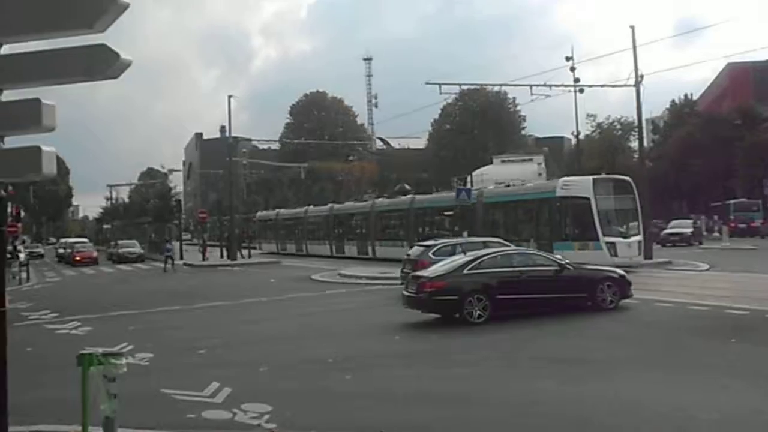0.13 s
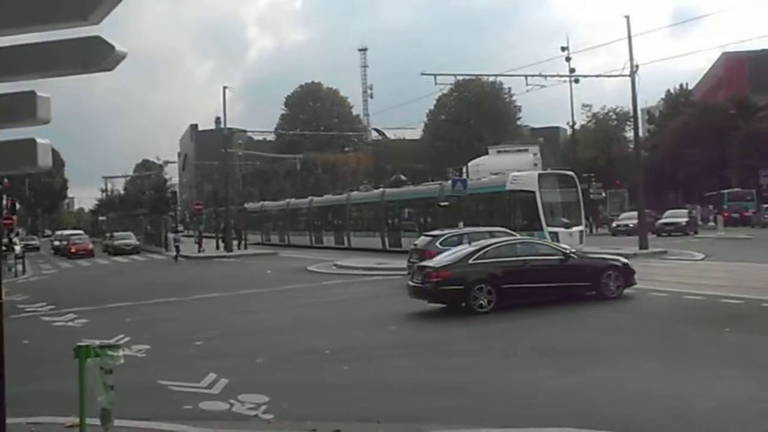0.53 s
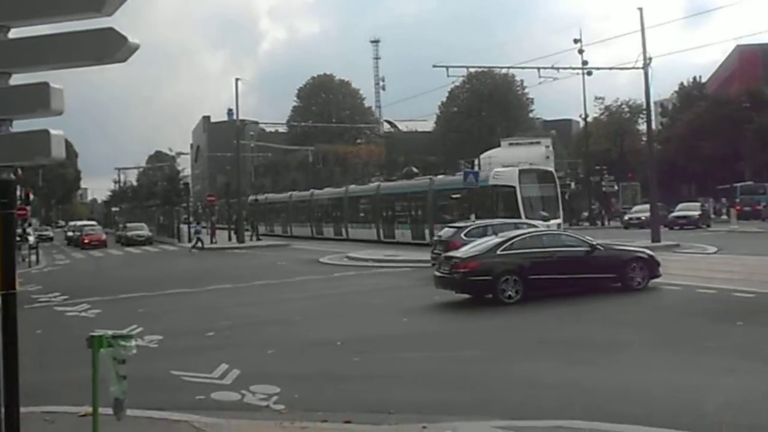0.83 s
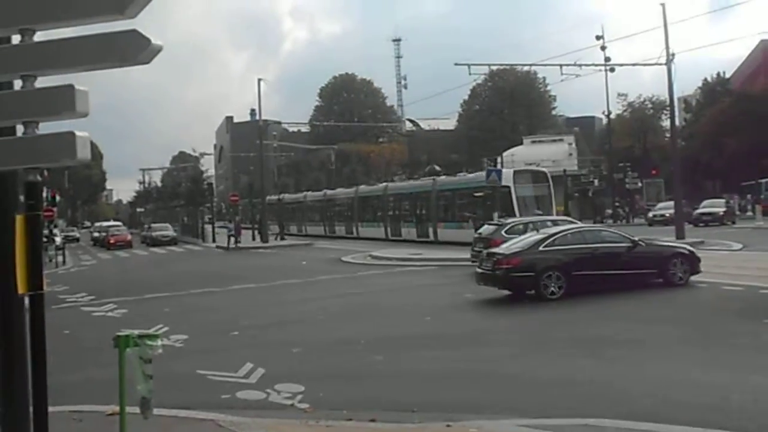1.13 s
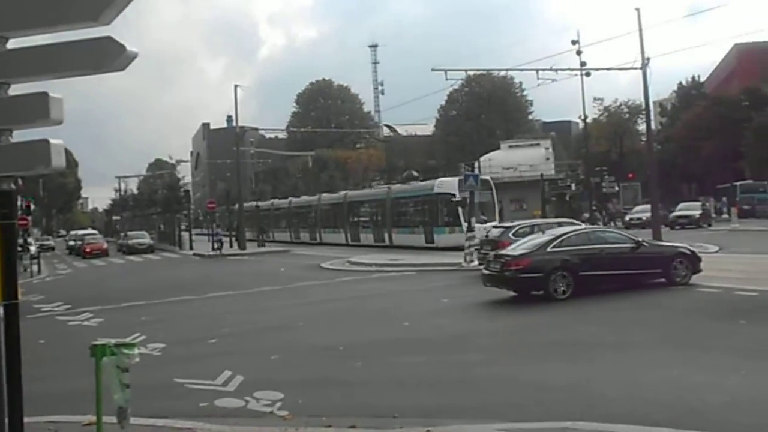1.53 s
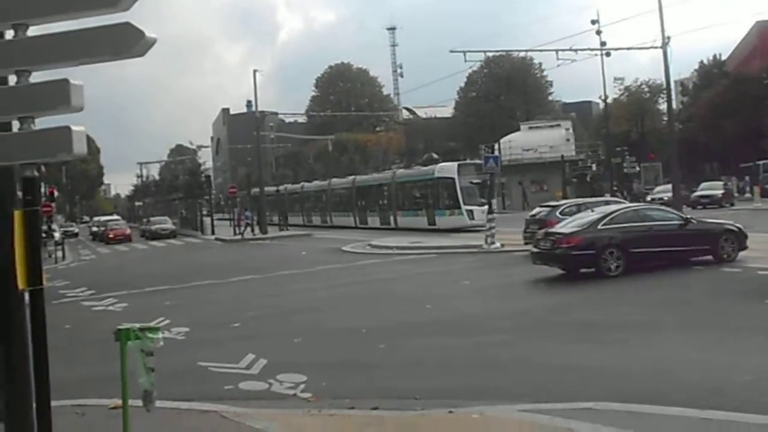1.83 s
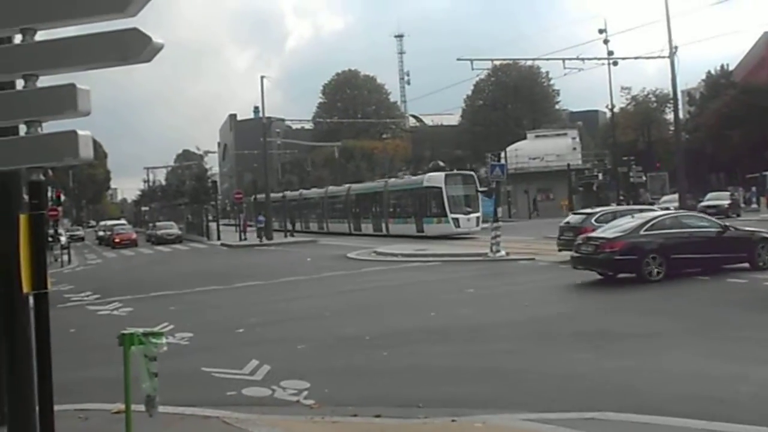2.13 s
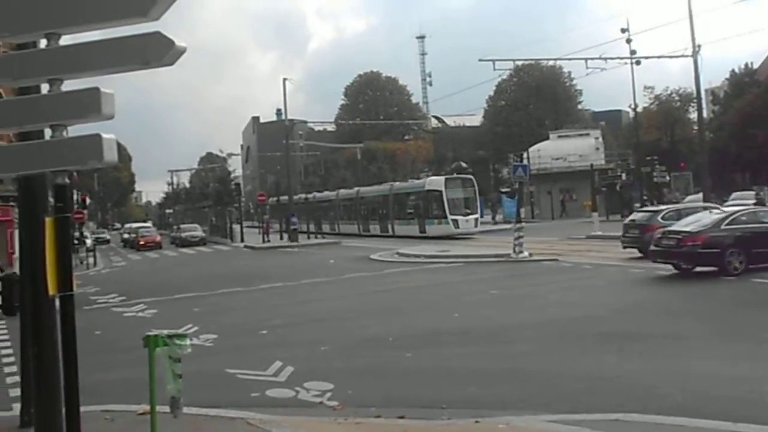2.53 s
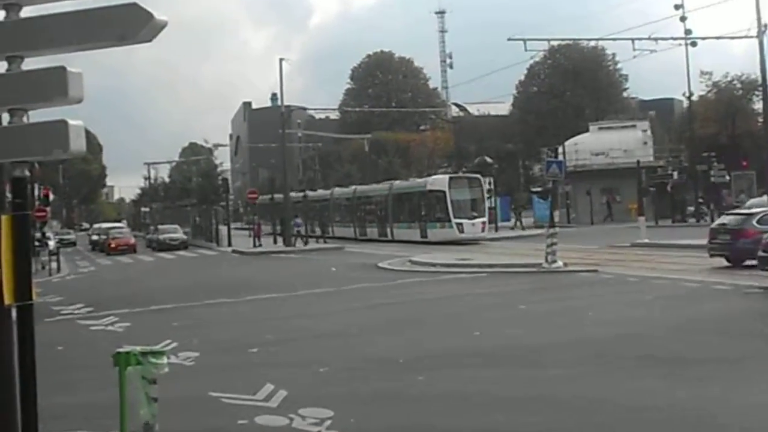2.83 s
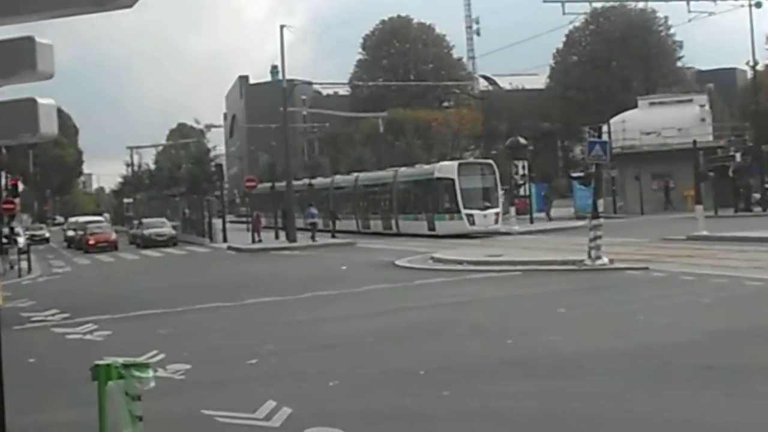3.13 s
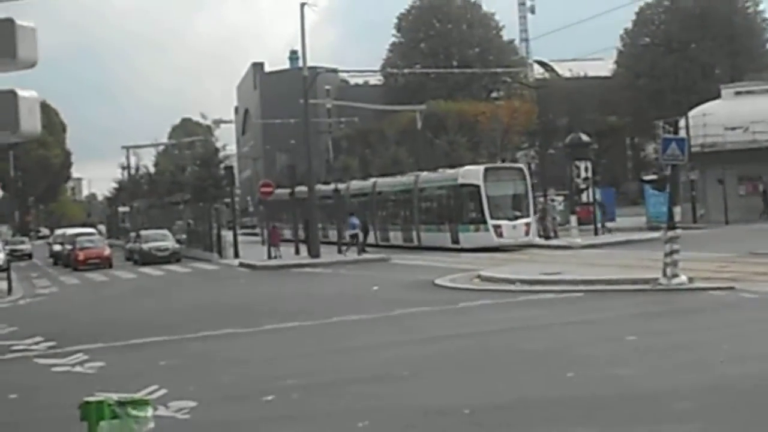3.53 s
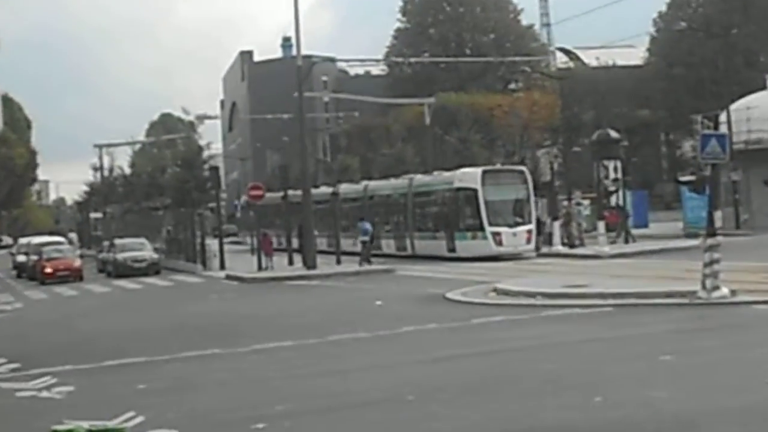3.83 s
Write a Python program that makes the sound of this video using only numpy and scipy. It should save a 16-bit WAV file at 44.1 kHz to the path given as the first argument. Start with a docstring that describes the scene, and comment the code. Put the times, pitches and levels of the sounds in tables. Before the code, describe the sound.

High, trembling metallic tram squeal rises out of fading-in road traffic noise at a junction

```python
"""Out of a moment's silence a broad city rumble fades up, with a tiny tick of hiss almost at once.
Traffic is shaped noise whose bands waver; engines and tram whines are unsteady tones mixed with narrow noise.
Two tram wheels then squeal on a curved rail: trembling tones with rough overtones, smeared by house echoes.
Puffs of filtered hiss, thin sagging squeaks and a sizzle of grinding flanges sit on top."""
import sys
import numpy as np
from scipy import signal
from scipy.fft import rfft, irfft
from scipy.io import wavfile

SR = 44100
rng = np.random.default_rng(int(sys.argv[2]) if len(sys.argv) > 2 else 0)


def waveform_to_disk(signal):
    """Save audio, clipped to [-1, 1], as 16-bit WAV at the path in sys.argv[1]."""
    frames = np.transpose(np.atleast_2d(signal))
    scaled = np.clip(frames, -1, 1) * 32767
    samples = np.round(scaled).astype(np.int16)
    wavfile.write(sys.argv[1], SR, samples)


N = 176400
TIME = np.arange(N) / SR
FREQS = np.arange(N // 2 + 1) * SR / N

# Noise colours, before their level curves: (frequency [Hz], relative density [dB per Hz])
RUMBLE_COLOUR = [(16, -80), (28, -55), (60, -52), (110, -56.5), (170, -60.5), (400, -67)]  # low traffic rumble
ROAD_COLOUR = [(60, -93), (150, -58.5), (235, -49.5), (330, -53), (440, -60.5), (540, -56), (660, -54),
               (790, -59), (900, -64), (1020, -64), (1220, -61), (1700, -70), (2400, -76.5), (2950, -86.5),
               (3600, -85.5), (4300, -91.5), (5200, -98), (7000, -115)]  # rolling noise
HISS_COLOUR = [(4500, -115), (6000, -101), (6800, -97), (7800, -90), (9000, -84.5), (10000, -80),
               (10600, -82.5), (11400, -90.5), (12000, -104)]  # tyre hiss
NEAR_CAR_COLOUR = [(90, -73), (130, -49.5), (290, -69), (385, -59), (520, -58.5), (800, -69.5), (1600, -73),
                   (3000, -88)]  # tyres of the nearest cars
SIZZLE_COLOUR = [(9900, -100), (10500, -67), (10850, -72), (11400, -73.5), (11700, -83), (12100, -112)]  # grinding flanges
# Gains as the vehicles pass: (time [s], rumble [dB], road [dB], tyre hiss [dB])
PASSING_GAINS = [(0.1, 7.5, -4.5, -5.5), (0.5, 7, 1, -1), (1.0, 2, 1, 0), (1.5, 0, -0.7, 1),
                 (1.95, 0.5, 0.2, 1.5), (2.4, 0, 0, -0.5), (3.0, 1.5, -.5, -0.5), (3.55, 1, -1, -1.5),
                 (4.0, -1, -0.5, -3)]
# Engine drones: (pitch [Hz], width [Hz], relative level [dB], loudest at [s], spread of swell [s])
ENGINE_DRONES = [(150.2, 7.8, -36, 2.17, 1), (264.8, 14.7, -35.5, 1.85, 1), (246.4, 61, -31.5, 0.66, 0.63),
                 (217, 12, -36, 3.04, 0.15), (672, 30.2, -43, 2.9, 0.51)]
# Thin tram whines: (pitch [Hz], width [Hz], relative level [dB], loudest at [s], spread of swell [s])
TRAM_WHINES = [(2459, 9, -60, 3.25, .7), (3830, 14, -58, 3.35, .22), (4916, 9, -71, 3.5, .33)]
# Puffs and ticks of hiss, before the band-pass:
# (time [s], spread [s], centre [Hz], width [Hz], relative level [dB])
HISS_PUFFS = [(0.165, .002, 9500, 1510, -47), (1.515, 0.01, 10300, 2400, -38.5),
              (1.524, 0.0067, 8150, 1000, -41), (1.543, 0.014, 8700, 1800, -43.5),
              (2.368, .002, 9800, 1976, -40)]
# Thin squeaks: (start [s], length [s], mid pitch [Hz], relative level [dB])
THIN_SQUEAKS = [(1.26, .09, 6000, -68), (1.59, .105, 5975, -62), (1.715, .11, 5940, -60),
                (1.845, .12, 5920, -60.5)]
# Gain of the flange sizzle: (time [s], level [dB])
SIZZLE_GAIN = [(1.5, -32), (2.1, -17), (2.9, -11), (3.3, -5.5), (3.65, -6), (3.85, -23), (4.0, -22)]
# Squeal of the leading wheel: (time [s], pitch [Hz], relative level [dB])
LEADING_WHEEL = [(1.325, 3765, -54), (1.385, 3700, -42), (1.46, 3712, -46.5), (1.68, 3735, -44),
                 (1.8, 3708, -45), (1.96, 3718, -43), (2.27, 3675, -45), (2.39, 3690, -43),
                 (2.5, 3630, -44), (2.62, 3612, -45), (2.8, 3645, -45), (3.05, 3668, -43),
                 (3.18, 3657, -41), (3.6, 3658, -42.5), (3.78, 3622, -48), (3.9, 3600, -56),
                 (4.0, 3640, -46)]
# Squeal of the trailing wheel: (time [s], pitch [Hz], relative level [dB])
TRAILING_WHEEL = [(1.35, 3580, -66), (1.55, 3570, -55), (2.15, 3560, -54), (2.33, 3520, -49.5),
                  (2.7, 3510, -48), (3.3, 3525, -47), (3.62, 3520, -46), (3.8, 3505, -51), (4.0, 3525, -53)]
# Flanges biting harder in the bend: (time [s], overtone gain [dB])
FLANGE_BITE = [(1.35, -11), (1.9, -10.5), (2.3, -3.5), (2.7, -1), (3.2, -3.5), (3.65, -1.5), (3.8, -7),
               (4.0, -6)]
# Treble notches: (centre [Hz], width [Hz])
TREBLE_NOTCHES = [(5512, 1200), (11025, 600)]

SWELL_DB, SWELL_HZ, FLUTTER_DB, FLUTTER_HZ = 0.34, 12, 0.3, 88  # slow and fast unevenness of the road
NEAR_AT_S, NEAR_SPREAD_S = 1.79, 0.91  # nearest cars crossing in front
SQUEAK_SAG_HZ_PER_S = 450
RUB_WIDTH_HZ = 153  # rough fringe round each squeal
LEADING_DB, TRAILING_DB = 0, -3.5  # balance of the two wheels
STREET_T60_S, FIRST_ECHO_S = 0.66, .012
SILENT_UNTIL_S = .073
GAIN_AT_ZERO, RISE_S_PER_UNIT_GAIN = 0.022, 1.543  # straight line of the fade-in
CUTOFF_HZ = 12250


def from_db(db):
    """Decibels to gain."""
    return 10 ** (np.asarray(db) / 20)


def rms_one(x):
    """Scale to unit power."""
    return x / np.sqrt(np.mean(x ** 2) + 1e-20)


def in_time(rows):
    """Columns of a curve, joined by straight lines."""
    s, *columns = np.transpose(rows)
    return [np.interp(TIME, s, column) for column in columns]


def narrow_noise(hz, width_hz):
    """Noise in one resonance, rms 1; the width spans its half-amplitude points."""
    resonance = 1 / (1 + (2 * (FREQS - hz) / width_hz) ** 2)
    return rms_one(irfft(rfft(rng.standard_normal(N)) * resonance, N))


def drift(rate_hz):
    """Random wander, rms about 1, halved in amplitude at the given rate."""
    size = N // 20  # drawn on a coarse time grid
    hz = np.arange(size // 2 + 1) * SR / N
    slow = irfft(rfft(rng.standard_normal(size)) / (1 + (hz / rate_hz) ** 2), size)
    return np.interp(np.arange(N) / 20, np.arange(size), rms_one(slow))


def hump(s, spread_s):
    """A smooth bell-shaped swell centred on s."""
    return np.exp(-.5 * ((TIME - s) / spread_s) ** 2)


def roar(colour, patchy_db):
    """Noise of a given density whose bands each waver on their own."""
    hz, db = np.transpose(colour)
    gain = from_db(np.interp(np.log(FREQS + 1), np.log(hz), db, right=-200))
    shaped = rfft(rng.standard_normal(N)) * gain * np.sqrt(SR / 2)
    edges = np.append(0, np.geomspace(100, 14000, 12))
    out = 0
    for low, high in zip(edges, edges[1:]):
        if low < hz[-1]:
            band = irfft(shaped * (FREQS >= low) * (FREQS < high), N)
            out = out + band * from_db(patchy_db * drift(21))
    return out


def wavering_tones(rows):
    """Unsteady tones blended with noise in the same resonance, each swelling and receding."""
    out = 0
    for hz, width_hz, db, s, spread_s in rows:
        phase = 2 * np.pi * np.cumsum(hz + .5 * width_hz * drift(7.6)) / SR
        blend = 0.76 * np.sin(phase) + 1.11 * narrow_noise(hz, width_hz)
        out = out + from_db(db) * hump(s, spread_s) * blend
    return out


def street(x, wet_db):
    """Direct sound plus a dying scatter of echoes from the house fronts, at about equal total power."""
    tail = rng.standard_normal(N) * from_db(-60 * TIME / STREET_T60_S) * (TIME > FIRST_ECHO_S)
    echoes = rms_one(signal.fftconvolve(x, tail)[:N]) * np.std(x)
    wet = from_db(wet_db)
    return (x + wet * echoes) / np.sqrt(1 + wet ** 2)


def traffic():
    """Low rumble, rolling noise, near cars and hiss; the uneven road shakes all tyre sounds together."""
    rumble_db, road_db, hiss_db = in_time(PASSING_GAINS)
    uneven_db = SWELL_DB * drift(SWELL_HZ) + FLUTTER_DB * drift(FLUTTER_HZ)
    rumble = from_db(rumble_db) * roar(RUMBLE_COLOUR, patchy_db=0.36)
    road = from_db(road_db + uneven_db) * roar(ROAD_COLOUR, patchy_db=0.5)
    passing = from_db(uneven_db) * hump(NEAR_AT_S, NEAR_SPREAD_S)
    near_cars = passing * roar(NEAR_CAR_COLOUR, patchy_db=3.1)
    hiss = from_db(hiss_db + .7 * uneven_db) * roar(HISS_COLOUR, patchy_db=1.0)
    return rumble + road + near_cars + hiss


def engines():
    """Low engine tones whose pitch wanders within a narrow band of noise."""
    return wavering_tones(ENGINE_DRONES)


def tram_whines():
    """Thin high tones of the tram, steadier because their bands are narrow."""
    return wavering_tones(TRAM_WHINES)


def spits():
    """Brief bright puffs: resonant noise under a short swell, band-passed together."""
    puffs = 0
    for s, spread_s, hz, width_hz, db in HISS_PUFFS:
        puffs = puffs + from_db(db) * hump(s, spread_s) * narrow_noise(hz, width_hz)
    bright_band = signal.butter(8, [6600, 11500], "band", fs=SR, output="sos")
    return signal.sosfilt(bright_band, puffs)


def squeaks():
    """Short high squeaks, sagging in pitch, with fast random wobble for grain."""
    out = 0
    for s, length_s, hz, db in THIN_SQUEAKS:
        pitch = hz - SQUEAK_SAG_HZ_PER_S * (TIME - s - length_s / 2) + 55 * drift(370)
        swell = np.sin(np.pi * np.clip((TIME - s) / length_s, 0, 1))
        level = from_db(db + 5.0 + 2.2 * drift(90)) * swell
        out = out + level * np.sin(2 * np.pi * np.cumsum(pitch) / SR)
    return street(out, wet_db=-10)


def flanges():
    """Steel grinding on the rail adds a band of high noise on top of the squeal."""
    db, = in_time(SIZZLE_GAIN)
    return from_db(db) * roar(SIZZLE_COLOUR, patchy_db=1.2)


def wheel(curve, jitter_hz, shudder_db, rub_db, second_db, third_db, wet_db):
    """Stick and slip keep one wheel mode ringing: a trembling line, a rough fringe, two rougher overtones."""
    hz, db = in_time(curve)
    bite_db, = in_time(FLANGE_BITE)
    phase = 2 * np.pi * np.cumsum(hz + jitter_hz * drift(60)) / SR
    level = from_db(db + shudder_db * drift(35)) * (TIME > curve[0][0]) * np.sqrt(2)
    # two independent drifts in quadrature spread noise round the tone
    rub = drift(RUB_WIDTH_HZ / 2) * np.sin(phase) + drift(RUB_WIDTH_HZ / 2) * np.cos(phase)
    second = from_db(second_db) * np.sin(2 * phase + 1.8 * drift(50))
    third = from_db(third_db) * np.sin(3 * phase + 2.1 * drift(50))
    squeal = 0.69 * np.sin(phase) + from_db(rub_db) * rub + from_db(bite_db) * (second + third)
    return street(level * squeal, wet_db)


def scene():
    """The junction from the kerb: traffic behind, squealing tram on top."""
    background = traffic() + engines() + tram_whines() + spits()
    leading = wheel(LEADING_WHEEL, jitter_hz=17.2, shudder_db=1.5, rub_db=-9.0,
                    second_db=-7.5, third_db=-22, wet_db=-5)
    trailing = wheel(TRAILING_WHEEL, jitter_hz=32.9, shudder_db=2.3, rub_db=-5.5,
                     second_db=-5.0, third_db=-1.5, wet_db=0)
    wheels = from_db(LEADING_DB) * leading + from_db(TRAILING_DB) * trailing
    return (background + squeaks() + flanges() + wheels)[None]


def record(dry):
    """A silent start, a straight fade-in, two treble notches and a steep top cut."""
    fade = np.clip(GAIN_AT_ZERO + TIME / RISE_S_PER_UNIT_GAIN, 0, 1)
    out = dry * fade * (TIME > SILENT_UNTIL_S)
    for hz, width_hz in TREBLE_NOTCHES:
        out = signal.lfilter(*signal.iirnotch(hz, hz / width_hz, fs=SR), out)
    top_cut = signal.ellip(10, .2, 80, CUTOFF_HZ, fs=SR, output="sos")
    return signal.sosfilt(top_cut, out)


dry = scene()
out = record(dry)
waveform_to_disk(out)
```